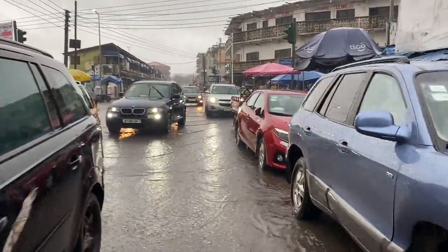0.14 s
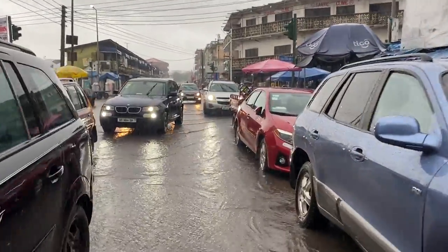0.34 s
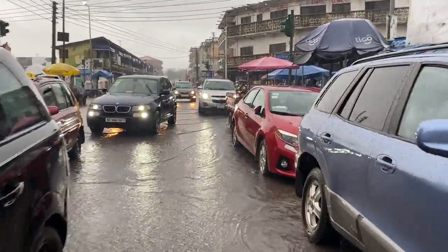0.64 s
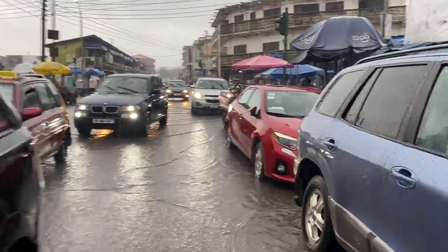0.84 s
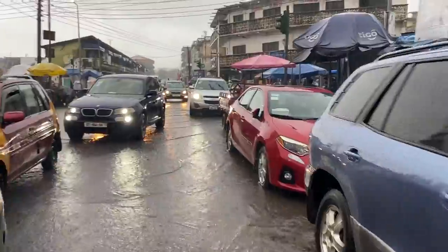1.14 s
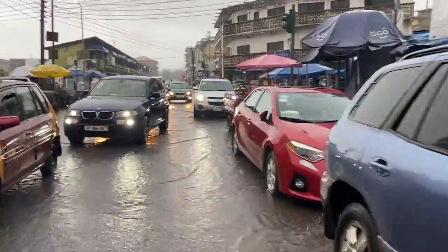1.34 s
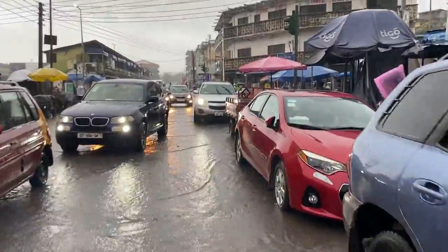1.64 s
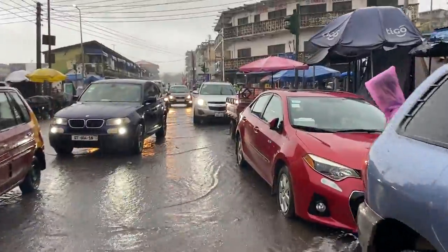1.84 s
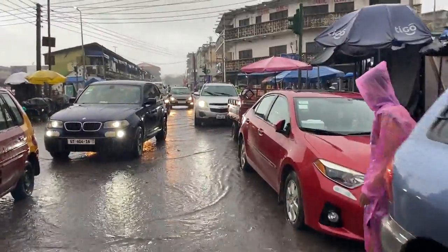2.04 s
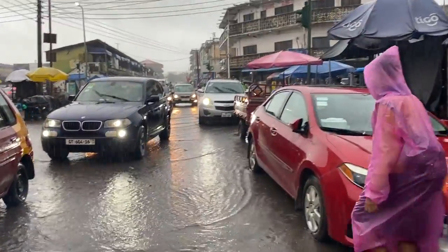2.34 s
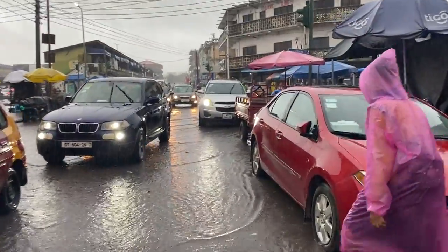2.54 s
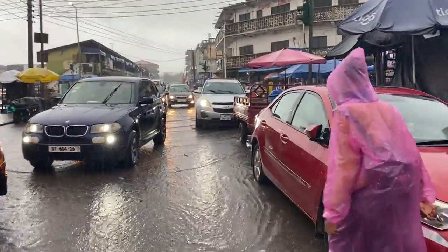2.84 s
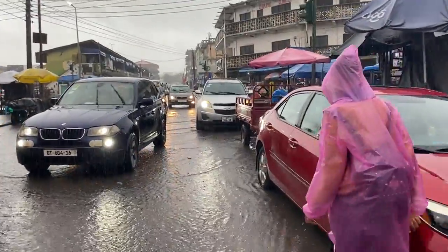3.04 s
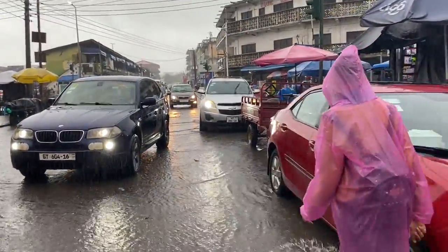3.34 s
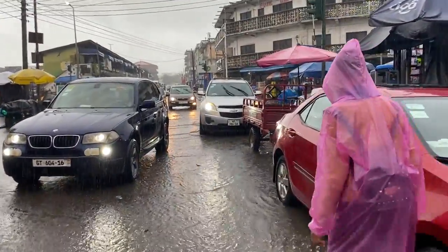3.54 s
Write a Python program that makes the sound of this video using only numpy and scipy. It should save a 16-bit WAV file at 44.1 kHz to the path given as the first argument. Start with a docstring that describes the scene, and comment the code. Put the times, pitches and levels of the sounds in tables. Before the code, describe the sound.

Dense rain falls all around on a flooded street, with small splashing steps and fat drops. A nearby engine booms and throbs low, then revs lightly near the end; handheld phone in stereo.

```python
"""Rain and an engine on a flooded street

Filtered noise and short decaying sines make a rain wash and dense drops, partly coherent at a phone's two ports.
Close by, an engine's harmonics beat in a throbbing boom, then rev, over band noise of a car rolling away,
low traffic growls and a faint hum of steady sines. Enveloped noise makes splashing steps, gliding tones
make wet rubber chirps, damped modes make fat drops knock, and one thin unsteady tone is a brake whistle."""
import sys
import numpy as np
from scipy import signal
from scipy.fft import rfft, irfft
from scipy.io import wavfile
from scipy.ndimage import uniform_filter1d

SR = 44100
rng = np.random.default_rng(int(sys.argv[2]) if len(sys.argv) > 2 else 0)


def unload_audio(sound):
    """Save the sound as a 16-bit wav file, at the path given as the first command line argument."""
    columns = np.transpose(np.atleast_2d(sound))
    # keep every value between -1 and 1, then stretch to whole-number steps
    steps = np.round(np.clip(columns, -1, 1) * 32767)
    wavfile.write(sys.argv[1], SR, steps.astype(np.int16))


N = 163170
T = np.arange(N) / SR  # time, s
F = np.arange(N // 2 + 1) * SR / N  # spectrum frequencies, Hz


def undb(db):
    """Amplitude ratio: 20 dB is a factor of ten."""
    return 10 ** (np.asarray(db) / 20)


def unit(x):
    """Power normalisation: scale to an rms of 1."""
    return x / np.sqrt(np.mean(x ** 2))


def walk(rate_hz):
    """Slow random modulation: held random levels, smoothed twice, with a standard deviation of 1."""
    hold = int(SR / rate_hz)
    levels = np.repeat(rng.standard_normal(N // hold + 1), hold)
    smooth = uniform_filter1d(uniform_filter1d(levels, hold), hold)[:N]
    return smooth / smooth.std()


def above(x, corner_hz):
    """Zero-phase high-pass: the gain is one half at the corner."""
    return irfft(rfft(x) * F ** 2 / (F ** 2 + corner_hz ** 2), N)


def bump(center_s, length_s):
    """Gaussian envelope whose standard deviation is half the length."""
    return np.exp(-.5 * ((T - center_s) / (length_s / 2)) ** 2)


def gliding_tones(table, waver):
    """Frequency modulation: phase integrates a gliding, wavering pitch under a bell-shaped envelope."""
    out = 0
    for center_s, level_db, pitch_hz, length_s, glide in table:
        bend = glide * np.clip((T - center_s) / length_s, -2, 2)
        phase = 2 * np.pi * np.cumsum(pitch_hz * (1 + bend + waver)) / SR
        out = out + undb(level_db) * bump(center_s, length_s) * np.sin(phase)
    return out


def wash():
    """Random superposition: noise in half-octave bands that swell together and flicker alone."""
    swell_db, flicker_db, flicker_db_per_octave = 0.28, 0.1, 0.2051
    spectrum = rfft(rng.standard_normal(N))
    swell = walk(2.82)
    half_octaves = 2 * np.log2(np.maximum(F, 1) / 20)
    out = 0
    for k in range(21):
        band = irfft(spectrum * np.clip(1 - abs(half_octaves - k), 0, 1), N)
        flicker = (flicker_db + flicker_db_per_octave * k / 2) * walk(14)
        out = out + band * undb(swell_db * swell + flicker)
    return unit(out)


def drops(spread_db):
    """Shot noise: uneven random impulses excite damped sines whose decay time is inverse to pitch."""
    drops_per_s, decay_cycles, cap_db = 2000, 3.5, 14
    out = np.zeros(N)
    for pitch_hz in 800 * np.sqrt(2) ** np.arange(9):
        draws = rng.random((int(drops_per_s * N / SR / 9), 3))
        places = (draws[:, 0] * N).astype(int)
        signs = np.sign(draws[:, 1] - .5)
        sizes_db = np.minimum(-spread_db * np.log(draws[:, 2]), cap_db)
        hits = np.zeros(N)
        np.add.at(hits, places, signs * undb(sizes_db))
        t = np.arange(256) / SR
        ring = np.exp(-t * pitch_hz / decay_cycles) * np.sin(2 * np.pi * pitch_hz * t)
        patter = unit(signal.fftconvolve(hits, ring)[:N])
        out += patter * np.sqrt(pitch_hz)  # power grows with bandwidth, as in white noise
    return unit(out)


def splashes():
    """Amplitude-modulated noise: each step lifts a bell-shaped burst of bright spray."""
    # Splashing steps: center_s, level_db (before the high-pass, against the wash), length_s
    steps = [(0.151, 2.5, 0.017), (0.322, -6, 0.04), (0.573, -2, 0.041), (1.06, -1, 0.059),
             (1.081, 6, 0.016), (1.492, 6.5, 0.017), (1.988, 3.7, 0.057), (2.11, 0, .04), (2.508, 1, 0.054),
             (2.937, 1, 0.093), (3.16, 0, .025), (3.214, 2, 0.057), (3.476, 1, 0.044), (3.64, 1, 0.17)]
    envelope = sum(undb(level_db) * bump(s, length_s) for s, level_db, length_s in steps)
    spray = unit(rng.standard_normal(N) + drops(4.0))
    return envelope * above(spray, 2550)


def rain():
    """Superposition of distant wash, near drops and splashes, before the street colours them."""
    # Rain that eases and partly returns: time_s, treble_db (gain of the wash's upper range)
    easing = [(0, 2.2), (1.3, -0.4), (3.7, 1)]
    bed = wash()
    treble_gain = undb(np.interp(T, *np.array(easing).T))
    bed += (treble_gain - 1) * above(bed, 800)
    near_drops = undb(-7.5) * above(drops(3.8), 1540)
    return bed + near_drops + splashes()


def ports(main, other):
    """Interchannel coherence: the right port mixes a phase-shifted copy with independent rain."""
    # Street sound at the left port: frequency_hz, density_db (relative), left_minus_right_db
    street = [(30, 0, -6), (53, 8.5, -5), (97, 10, 3.5), (162, 5.5, 2), (266, 4, 3), (350, 4.5, 0.4),
              (498, 5.5, 1.5), (543, 3.5, 3.5), (790, 2, 5.5), (1020, 2.5, 4), (1370, -2, 0.5),
              (2170, -4, 1.1), (2780, -8, 1.5), (4030, -12, 1.4), (5280, -14, 0.4), (7500, -19.5, 0.8),
              (12200, -22.5, 1.6), (13400, -34, -0.5), (15700, -36.5, -1)]
    # Relation of the two ports: frequency_hz, coherence (0-1), left_lead_rad
    port_relation = [(60, .99, .15), (120, .87, .3), (350, .53, .3), (430, .25, 1.5), (520, .45, 3.4),
                     (700, .76, 3.9), (1000, .42, 4.7), (1200, .2, 3.9), (1500, .33, 2.8), (2000, .2, 1.6),
                     (2800, .47, .55), (4700, .43, .3), (5600, .25, -.1), (6800, .6, .1), (7600, .75, -.8),
                     (8800, .97, -3.0), (10300, .8, -5.1), (11000, 1, -6.25), (12300, .75, -8.2),
                     (12900, 1, -9.4), (13700, 1, -9.45), (14300, .7, -11), (14800, 1, -12.57)]

    def at(table, column):
        """Interpolation of a column on a logarithmic frequency axis."""
        values = np.array(table)
        return np.interp(np.log(np.maximum(F, 1)), np.log(values[:, 0]), values[:, column])

    coherence = at(port_relation, 1)
    lag = np.exp(-1j * at(port_relation, 2))
    gain = undb(at(street, 1)) * (F > 20)
    left = gain * rfft(main)
    right = coherence * lag * rfft(main) + np.sqrt(1 - coherence ** 2) * rfft(other)
    right = gain * undb(-at(street, 2)) * right
    return unit(np.array([irfft(left, N), irfft(right, N)])) * undb(-25)


def engine():
    """Harmonics of the engine cycle: orders 7 and 8 beat once a cycle; other orders sound under load."""
    # Engine course: time_s, cycle_hz, boom_db, throb_db, load_db (boom and throb rms before panning)
    course = [(0, 7.33, -28, -48, -60), (.25, 7.3, -23, -42, -58), (.7, 7.24, -21.3, -35, -58),
              (1.05, 7.24, -20, -29.5, -58), (1.35, 7.24, -18.6, -30.5, -58),
              (1.95, 7.25, -17.8, -25.5, -58), (2.3, 7.24, -18.3, -29, -58), (2.6, 7.27, -17.8, -30, -55),
              (2.75, 7.45, -24, -32, -42), (2.9, 8.5, -25, -33, -35), (3.05, 9.4, -31, -42, -30),
              (3.25, 9.55, -40, -48, -27), (3.45, 9.5, -38, -50, -29), (3.7, 9.3, -36, -50, -32)]
    # Idle partials: order (multiple of cycle rate), level_db (mean, rms before panning)
    idle_partials = [(9, -41), (10, -38), (12, -39), (16, -43)]
    # Partials under load: order (multiple of cycle rate), level_db (relative to load_db)
    loaded_partials = [(4, -1.5), (5, 1), (6, 0.5), (9, -0.5), (12, -3.5)]
    # Span over which the idle partials fade: start_s, end_s
    idle_fade = 2.75, 3.1
    boom_order, throb_order = 8, 7
    aligned_s = 2.021  # a moment when boom and throb peak together
    time_s, cycle_hz, boom_db, throb_db, load_db = np.array(course).T
    cycles = np.cumsum(np.interp(T, time_s, cycle_hz)) / SR
    phase = 2 * np.pi * (cycles - np.interp(aligned_s, T, cycles))

    def tone(order, level_db, start_rad=0):
        """Harmonic motion at a whole multiple of the cycle rate, with its level as rms."""
        return np.sqrt(2) * undb(level_db) * np.cos(order * phase + start_rad)

    def random_phase():
        """Phase drawn evenly around the circle."""
        return 2 * np.pi * rng.random()

    out = tone(boom_order, np.interp(T, time_s, boom_db))
    out += tone(throb_order, np.interp(T, time_s, throb_db))
    idle = sum(tone(k, db + 3 * walk(4), random_phase()) for k, db in idle_partials)
    out += np.interp(T, idle_fade, [1, 0]) * idle
    load = np.interp(T, time_s, load_db)
    for order, level_db in loaded_partials:
        out += tone(order, level_db + load + 1.3 * walk(3.84), random_phase())
    return out


def rumble():
    """Resonant filtering: low tyre and body noise fades as a car rolls away."""
    # Fading rumble: time_s, level_db (rms before panning)
    fading = [(.4, -32), (.9, -37), (1.4, -48), (2.2, -56)]
    center_hz, half_width_hz = 156, 140
    response = 1 / (1 + ((F - center_hz) / half_width_hz) ** 2)
    band = irfft(rfft(rng.standard_normal(N)) * response, N)
    time_s, level_db = np.array(fading).T
    return unit(band) * undb(np.interp(T, time_s, level_db, right=-120))


def hum():
    """Amplitude modulation: thin tones of steady pitch waver in level."""
    # Hum somewhere in the street: pitch_hz, level_db (mean, rms before panning)
    hum_tones = [(150, -50), (232.8, -43.5), (500, -47.5), (699, -48)]
    out = 0
    for pitch_hz, level_db in hum_tones:
        tone = np.sin(2 * np.pi * (pitch_hz * T + rng.random()))
        out = out + np.sqrt(2) * undb(level_db + 2.3 * walk(3.1)) * tone
    return out


def growls():
    """Frequency modulation: short low traffic tones glide with a slow waver."""
    # Traffic growls: center_s, level_db (peak before panning), pitch_hz, length_s, glide (pitch share per length)
    growl_tones = [(.12, -30, 116.3, 0.16, -0.024), (.34, -27.5, 141, .13, .05),
                   (1.21, -31.5, 239.3, .12, -0.1), (1.42, -25, 82.9, 0.285, -.05),
                   (1.76, -30, 118, 0.15, 0.049)]
    return gliding_tones(growl_tones, 0.0146 * walk(13))


def brake_whistle():
    """Narrow-band oscillation: one high tone with slight pitch wander and a changing level."""
    # Brake whistle: time_s, level_db (rms)
    whistle_course = [(.15, -75), (.19, -47), (.27, -58), (.41, -46), (.47, -64), (.56, -75)]
    pitch_hz = 14400 * (1 + 0.0011 * walk(20))
    time_s, level_db = np.array(whistle_course).T
    gain = undb(np.interp(T, time_s, level_db, left=-120, right=-120))
    return np.sqrt(2) * gain * np.sin(2 * np.pi * np.cumsum(pitch_hz) / SR)


def chirps():
    """Frequency modulation: wet rubber chirps are short tones roughened by fast pitch waver."""
    # Wet rubber chirps: center_s, level_db (peak), pitch_hz, length_s, glide (pitch share per length)
    chirp_tones = [(.788, -32, 3290, .012, .03), (.938, -29.5, 4330, .008, 0.0075),
                   (2.494, -30, 4500, 0.016, .05), (2.77, -37, 4730, .02, 0),
                   (2.943, -35, 4500, 0.0158, .03)]
    return gliding_tones(chirp_tones, 0.0454 * walk(1200))


def knocks():
    """Modal synthesis: a fat drop excites damped modes and a longer noisy spatter."""
    # Fat drops: start_s, level_db (of the mode at ratio 1), pitch_hz
    fat_drops = [(1.03, -24, 885), (1.852, -24, 1800), (2.406, -24, 1294), (3.165, -23.5, 2180),
                 (3.233, -18, 1200)]
    # Modes of a fat drop: pitch_ratio, level_db (relative to the drop), t60_s
    modes = [(.7, -3, .028), (1, 0, .035), (1.42, -3, .028)]
    spatter_db, spatter_t60_s = -14, 0.19
    wobble = 1 + .04 * walk(1500)
    out = 0
    for start_s, level_db, pitch_hz in fat_drops:
        t = np.clip(T - start_s, 0, 1)
        phase = 2 * np.pi * pitch_hz * np.cumsum((t > 0) * wobble) / SR

        def fade(t60_s):
            """Exponential damping: 60 dB in t60."""
            return np.exp(-np.log(1000) * t / t60_s)

        spatter = undb(spatter_db) * fade(spatter_t60_s) * walk(700) * np.sin(phase)
        ring = sum(undb(db) * fade(t60_s) * np.sin(ratio * phase) for ratio, db, t60_s in modes)
        out = out + undb(level_db) * (spatter + ring)
    return out


def scene():
    """Stereo superposition: rain all round; level and delay put the engine group a little left."""
    lag_s, pan_db = .00044, 2.2
    motor = engine() + rumble() + growls() + hum()
    late = np.interp(T - lag_s, T, motor)
    pair = np.array([motor * undb(pan_db / 2), late * undb(-pan_db / 2)])
    return ports(rain(), rain()) + pair + brake_whistle() + chirps() + knocks()


def record(dry):
    """Band limiting: the phone thins the deepest bass and cuts the top steeply."""
    bass_cut = signal.butter(2, 30, "high", fs=SR, output="sos")
    top_cut = signal.ellip(14, .2, 70, 15720, fs=SR, output="sos")  # ripple dB, stopband dB, edge Hz
    return signal.sosfilt(top_cut, signal.sosfilt(bass_cut, dry))


dry = scene()
out = record(dry)
unload_audio(out)
```